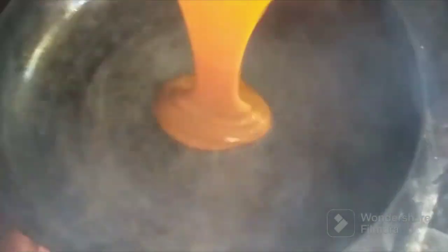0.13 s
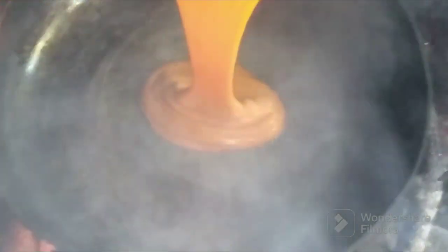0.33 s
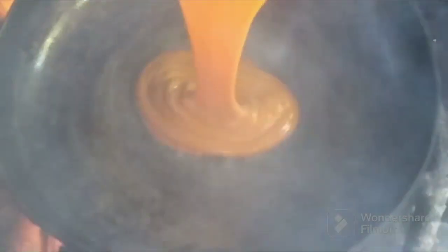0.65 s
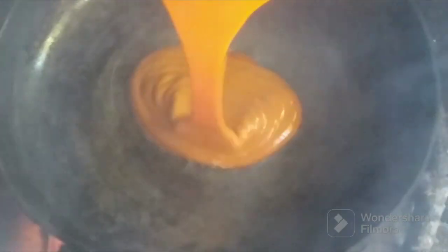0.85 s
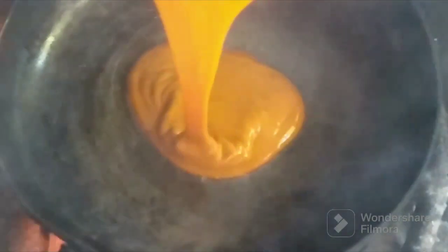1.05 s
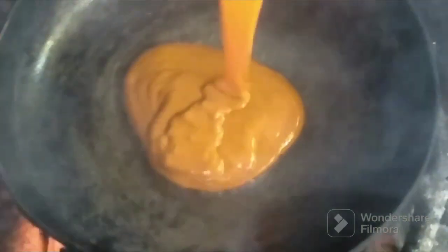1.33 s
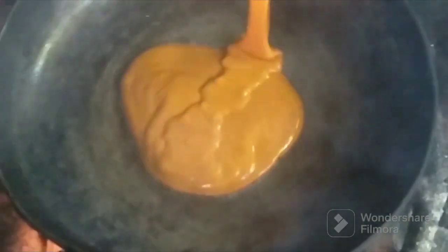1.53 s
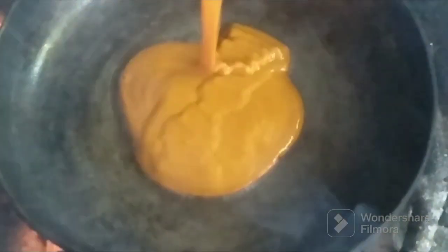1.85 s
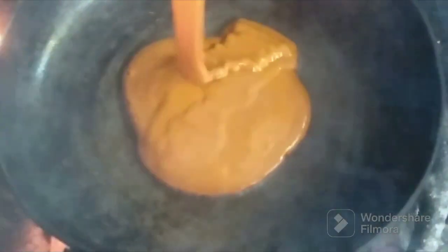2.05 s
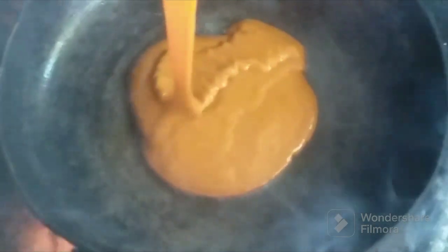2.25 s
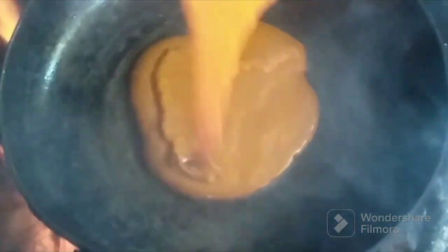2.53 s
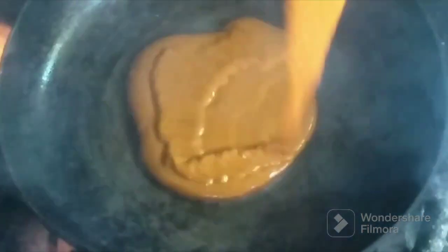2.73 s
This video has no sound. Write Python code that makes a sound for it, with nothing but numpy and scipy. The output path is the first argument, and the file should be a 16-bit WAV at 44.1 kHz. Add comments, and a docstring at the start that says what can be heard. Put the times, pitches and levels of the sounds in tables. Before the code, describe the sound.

A close, fizzing sizzle builds and holds as batter is poured into a hot pan in a kitchen. Something knocks once early on, then fat spits and steam spurts through the crackle, over a faint low hum.

```python
"""Pancake batter sizzles as it is poured into a very hot frying pan, heard close up in a kitchen.
Steam bursts from under the spreading edge in thousands of tiny pops: a crackle, a hiss and a fine fizz,
with sharper spits of fat, brief spurts of steam and short lulls. Early on the steam sings in a narrow
band and something knocks once. A low hum and a short room tail sit behind it all."""
import sys
import numpy as np
from scipy import signal
from scipy.fft import rfft, irfft
from scipy.io import wavfile

SR = 44100
rng = np.random.default_rng(int(sys.argv[2]) if len(sys.argv) > 2 else 0)


def digitize_waveform(pressure):
    """Quantize a signal to 16-bit integers and store it at the path in sys.argv[1].

    Rows of a 2-D input are taken as channels; values are limited to [-1, 1].
    """
    field = np.atleast_2d(pressure).T
    bounded = np.clip(field, -1, 1)
    quanta = np.round(bounded * 32767).astype(np.int16)
    wavfile.write(sys.argv[1], SR, quanta)


N = 127890


def amp(db):
    """Decibels to gain."""
    return 10 ** (np.asarray(db) / 20)


def unit(x):
    """Scales to rms 1."""
    return x / np.sqrt(np.mean(x ** 2) + 1e-20)


def add(mix, start_s, sound):
    """Mixes a sound in at its cue."""
    part = mix[round(start_s * SR):][:len(sound)]
    part += sound[:len(part)]


def curve(points, column=1):
    """A fader ride: one column of a timed table, interpolated to every sample."""
    rows = np.array(points)
    return np.interp(np.arange(N) / SR, rows[:, 0], rows[:, column])


def colour(x, eq, size=4096):
    """Plays x through an EQ curve, as a minimum-phase filter of unit energy."""
    hz, db = np.transpose(eq)
    bin_hz = abs(np.fft.fftfreq(size, 1 / SR)) + 1
    log_gain = np.log(amp(np.interp(np.log(bin_hz), np.log(hz), db)))
    response = np.exp(np.conj(signal.hilbert(log_gain)))
    ring = np.fft.ifft(response).real[:size // 2]
    return signal.oaconvolve(x, ring / np.linalg.norm(ring))[:len(x)]


# EQ of the room tone: f/Hz, level/dB
ROOM_TONE_EQ = [(20, 2), (45, -5.5), (85, -9.5), (120, -6.5), (135, -10), (155, -4.5), (185, -11.5),
                (250, -17.5), (310, -10.5), (420, -20), (1000, -20), (8000, -49)]


def room_tone(level_db=-56.5):
    """The kitchen's low hum, a steady bed of dark noise."""
    return amp(level_db) * unit(colour(rng.standard_normal(N), ROOM_TONE_EQ, size=16384))


def room_tail(send, t60_s=0.31):
    """Sparse kitchen reflections arrive after 3 ms and die away quickly."""
    t = np.arange(SR // 2) / SR
    reflections = rng.standard_normal(len(t)) * (rng.random(len(t)) < .06) * (t > .003)
    tail = reflections * amp(-60 * t / t60_s)
    return signal.oaconvolve(send, tail / np.linalg.norm(tail))[:N]


# The knock's hit and two rebounds: t/s, level/dB
KNOCK_HITS = [(0.242, -16), (0.2441, -20), (.2474, -26)]
# Modes of the struck body: f/Hz, level/dB, t60/s
KNOCK_RING = [(162, -19.5, 0.16), (320, -18.5, 0.048), (547, -11.5, 0.025), (820, -9, .012),
              (1044, -6, 0.027), (1420, -8, 0.0098), (1750, -14, 0.0072), (2730, -3, 0.0099),
              (3670, 1.5, .005), (4450, -7, 0.0046)]
# EQ of the scuff on contact: f/Hz, level/dB
SCUFF_EQ = [(200, -8), (700, -3), (1500, 2), (2100, -8), (3300, -1), (4700, -5), (6000, -18), (15000, -20)]


def knock(scuff_db=-11, scuff_decay_s=0.0024, low_cut_hz=165, rebound_high_cut_hz=1800):
    """A dull, scuffing knock with two softer rebounds, likely a utensil against the batter bowl."""
    out, t = np.zeros(N), np.arange(SR // 3) / SR
    ring = sum(amp(db - 60 * t / t60) * np.sin(2 * np.pi * hz * t) for hz, db, t60 in KNOCK_RING)
    scuff = amp(scuff_db) * colour(rng.standard_normal(len(t)) * np.exp(-t / scuff_decay_s), SCUFF_EQ)
    hit = signal.lfilter(*signal.butter(2, low_cut_hz, "high", fs=SR), ring + scuff)
    rebound = signal.lfilter(*signal.butter(1, rebound_high_cut_hz, fs=SR), hit)
    for k, (start_s, db) in enumerate(KNOCK_HITS):
        add(out, start_s, amp(db) * (rebound if k else hit))
    return out


# Cues for the spurts of steam: t/s, level/dB
SPURT_CUES = [(.568, -43), (0.887, -41), (1.512, -40.5), (1.785, -42), (2.395, -40.5), (2.635, -44)]


def spurts(rise_s=0.0073):
    """Puffs of steam escape from under the batter, in the sizzle's three lower bands."""
    out, t = np.zeros(N), np.arange(SR // 10) / SR
    for start_s, db in SPURT_CUES:
        puff = rng.standard_normal(len(t)) * t / rise_s * np.exp(1 - t / rise_s)
        body = colour(puff, FRY_EQ) + amp(-3.5) * colour(puff, CRACKLE_EQ)
        add(out, start_s, amp(db) * (body + amp(-1) * colour(puff, SING_EQ)))
    return out


# Cues for the spits of fat: t/s, level/dB, fizz over hiss/dB
SPIT_CUES = [(0.3696, -1, -9), (.537, -17, 7), (0.673, 0.5, -9), (.862, -0.5, -3), (.938, -11, 8),
             (.954, -3.5, 8.5), (1.128, -5, 4), (1.283, 2.5, -6), (1.3942, -2, 7), (1.778, -0.5, 6),
             (1.8765, 0, -3), (1.9502, -5, 10), (1.981, -12, 0), (2.016, -3.5, 6), (2.223, -8.5, 14),
             (2.401, -9, 11), (2.507, -0.5, -7), (2.583, -1.5, 5), (2.754, -2, 3), (2.819, -5.5, 6)]


def spits(trim_db=-8, decay_s=0.0067, crack=0.71):
    """Fat spits with a sharp crack and a short, bright spray of smaller pops."""
    out, t = np.zeros(N), np.arange(SR // 20) / SR
    for start_s, db, fizz_db in SPIT_CUES:
        spray = rng.standard_normal(len(t)) * np.exp(-t / decay_s)
        spray /= np.linalg.norm(spray)
        spray[0] = crack  # one-sample transient
        treble = colour(spray, HISS_EQ) + amp(fizz_db) * colour(spray, FIZZ_EQ)
        add(out, start_s, amp(trim_db + db) * (treble + amp(-9) * colour(spray, FRY_EQ)))
    return out


def ticks(level_db, per_s=170):
    """Larger bubbles burst as scattered sharp ticks that stand out of the top end."""
    train = rng.choice([-1, 1], N) * rng.uniform(.4, 1, N) * (rng.random(N) < per_s / SR)
    return amp(level_db) * unit(colour(train, FIZZ_EQ) + amp(-4) * colour(train, HISS_EQ))


def clumps(slow_hz=7.7, fast_hz=263, slope=0.54):
    """The boil swells and thins at random, mostly between the two rates; rms 1."""
    hz = np.fft.rfftfreq(N, 1 / SR) + 1
    shape = hz ** -slope / (1 + (slow_hz / hz) ** 2) / (1 + (hz / fast_hz) ** 2)
    return unit(irfft(rfft(rng.standard_normal(N)) * shape, N))


def pops(eq, level_db, boil_db, per_s, clump_db, spread_db=2):
    """A dense train of bursting bubbles, mostly tiny, all ringing through one EQ."""
    size = amp(spread_db * np.minimum(rng.exponential(1, N), 5.3))  # capped to tame the biggest
    train = size * rng.choice([-1, 1], N) * (rng.random(N) < per_s / SR)
    flutter = amp(boil_db + clump_db * clumps())
    return amp(level_db) * unit(colour(train * flutter, eq))


# EQs of the low crackle, frying mids, singing steam, hiss and fizz: f/Hz, level/dB
CRACKLE_EQ = [(100, -29), (300, -26.5), (520, -15), (700, -20.5), (830, -9), (1020, -0.5), (1270, -2),
              (1400, -8), (1720, 0), (1990, -0.5), (2080, -6.5), (2400, -3.5), (3000, -9), (4000, -36),
              (8000, -56)]
FRY_EQ = [(1500, -27), (2600, -3), (3050, 2.5), (3300, -0.5), (3800, 1), (4200, -0.5), (4700, 1.5),
          (5200, -3.5), (5450, 0), (5900, -5), (6900, -1.5), (8500, -18), (15000, -45)]
SING_EQ = [(1200, -49), (2250, -27.5), (2560, -12), (2665, -6.5), (2705, -0.5), (2745, -5.5), (2870, -12),
           (3200, -25.5), (5000, -47)]
HISS_EQ = [(2000, -45), (6200, -16.5), (7300, -8), (7900, -1), (8650, -1), (9200, -3.5), (10200, -7.5),
           (12000, -18), (16000, -19.5)]
FIZZ_EQ = [(1000, -32), (6000, -17.5), (9000, -9), (10800, 0), (12400, 0.5), (13300, 1.5), (14400, 0.5),
           (15300, 4), (16000, -2.5)]
# Fader rides of the crackle, frying mids and singing steam: t/s, level/dB
CRACKLE_RIDE = [(0, -56.5), (.2, -47.5), (.35, -47), (.57, -42), (1.0, -40), (1.2, -42.5), (1.5, -40.5),
                (2.0, -41), (2.42, -42.5), (2.62, -46), (2.77, -43.5), (2.85, -45.5)]
FRY_RIDE = [(0, -50), (.16, -42.5), (.6, -38.5), (1.0, -39), (1.45, -40.5), (1.65, -42), (2.42, -41.5),
            (2.6, -44), (2.77, -43), (2.9, -44)]
SING_RIDE = [(0, -40), (.2, -42.5), (.6, -41.5), (1.05, -43), (1.5, -48), (1.65, -52), (2.0, -48),
             (2.4, -47.5), (2.9, -55)]
# Fader rides of the top end: t/s, hiss level/dB, fizz level/dB
TREBLE_RIDE = [(0, -48, -46), (.05, -43, -44), (.15, -37, -42), (.27, -38, -38), (.45, -37.5, -37.5),
               (.65, -35, -33), (.85, -35.5, -32.7), (1.0, -34, -32.5), (1.2, -36, -33), (1.37, -34, -31.5),
               (1.55, -33.5, -32), (1.68, -31, -32), (1.92, -32, -31.7), (2.1, -33.5, -31),
               (2.2, -33, -30.5), (2.32, -35, -31), (2.42, -34.5, -29), (2.49, -37, -33.5),
               (2.65, -36, -33.5), (2.76, -35.5, -34.5), (2.9, -35.5, -34.5)]
# Lulls when a pocket of steam has emptied: t/s, depth/dB, recovery/s
LULL_CUES = [(1.532, 2.5, .035), (2.234, 5, .028), (2.592, 4, 0.022), (2.805, 4.5, 0.052)]


def sizzle():
    """Steam bursts from under the batter: five bands of pops share one boil and duck in the lulls."""
    t = np.arange(N) / SR
    boil_db = 0.49 * clumps()
    treble_boil_db = boil_db + 1.1 * clumps()
    hiss_db, fizz_db = curve(TREBLE_RIDE, column=1), curve(TREBLE_RIDE, column=2)
    crackle = pops(CRACKLE_EQ, curve(CRACKLE_RIDE), boil_db, per_s=4200, clump_db=0.6)
    fry = pops(FRY_EQ, curve(FRY_RIDE), boil_db, per_s=9800, clump_db=1.52)
    sing = pops(SING_EQ, curve(SING_RIDE), boil_db, per_s=5600, clump_db=0.3)
    hiss = pops(HISS_EQ, hiss_db, treble_boil_db, per_s=3500, clump_db=1.0)
    fizz = pops(FIZZ_EQ, fizz_db, treble_boil_db, per_s=16800, clump_db=0.8)
    duck_db = sum(depth_db * (t > start_s) * np.exp(-((t - start_s) / recovery_s) ** 2)
                  for start_s, depth_db, recovery_s in LULL_CUES)
    return (crackle + fry + sing + hiss + fizz + ticks(fizz_db - 7.5)) * amp(-duck_db)


def scene():
    """Mono mix: pan and knock up front with a little room, over the low hum."""
    pan = sizzle() + spits() + spurts()
    hit = knock()
    hum = room_tone()
    reverb = room_tail(amp(-12.5) * pan + amp(-18.5) * hit)
    return (pan + hit + reverb + hum)[None]


def record(dry, high_cut_hz=15520):
    """A steep high cut on the master trims the top of the fizz."""
    high_cut = signal.firwin(1023, high_cut_hz, window=("kaiser", 9), fs=SR)
    return signal.oaconvolve(dry, high_cut[None], "same")


dry = scene()
out = record(dry)
digitize_waveform(out)
```